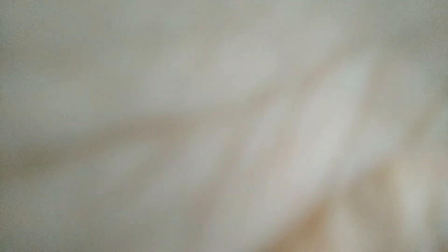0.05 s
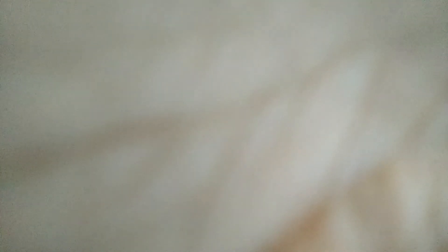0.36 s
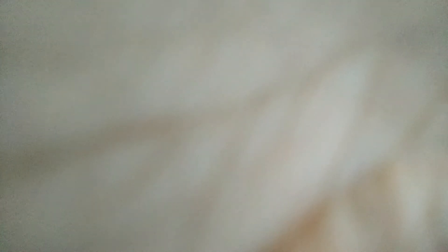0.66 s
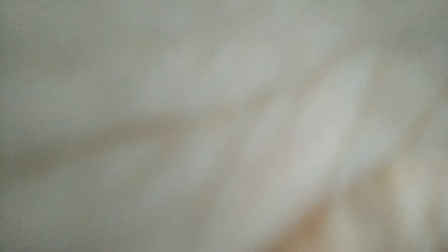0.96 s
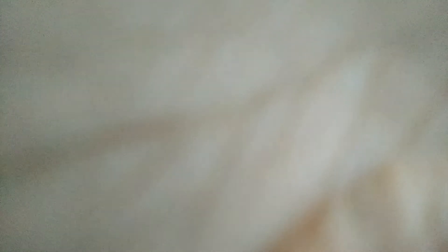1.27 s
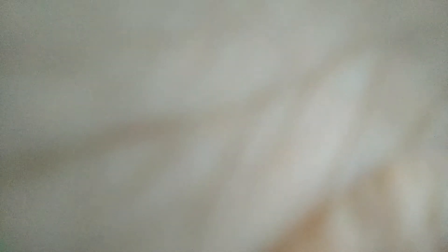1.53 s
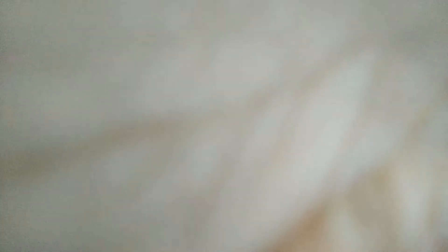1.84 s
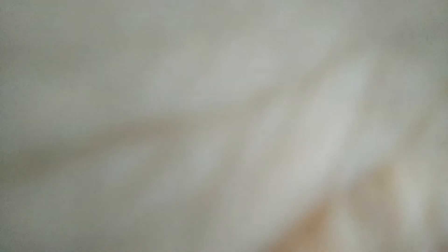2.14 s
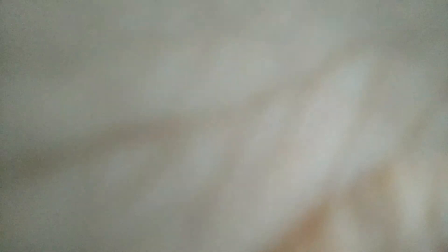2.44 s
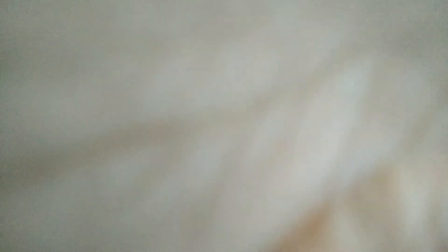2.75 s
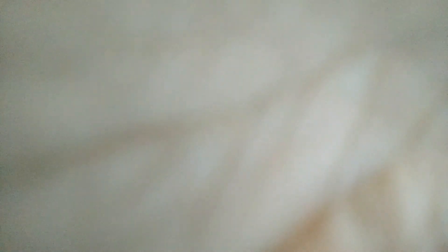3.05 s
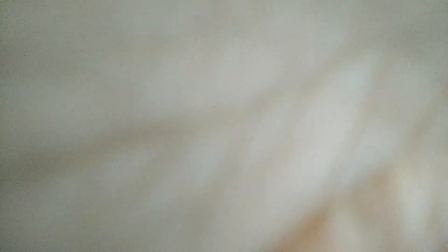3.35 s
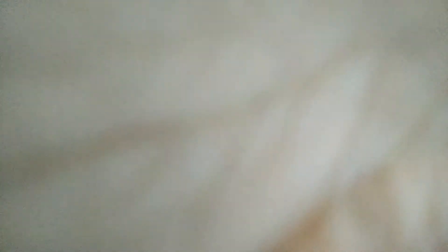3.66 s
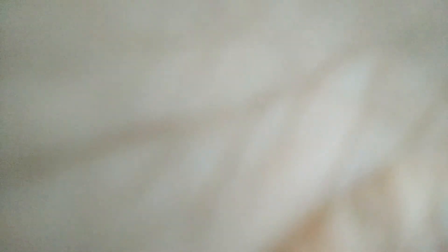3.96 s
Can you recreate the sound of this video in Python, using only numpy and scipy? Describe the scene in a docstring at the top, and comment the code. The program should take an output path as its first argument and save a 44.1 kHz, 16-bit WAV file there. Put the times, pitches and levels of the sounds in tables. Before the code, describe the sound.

Heard from the cabin, a vehicle's engine hums deeply over rumbling tyres while a loose panel buzzes. The engine drops in pitch, the rattle breaks into bursts with faint trim ticks between, and a low boom closes.

```python
"""Inside a moving vehicle, the engine drones low over the rumble of the road.
A loose panel rattles against its mount from the start, harder once in each engine firing cycle.
Past halfway the rattle stops, then returns briefly as the engine slows, as at a gear change.
A few light ticks of loose trim fill the next pause, and the rattle starts again.
Near the end the cabin booms."""
import sys
import numpy as np
from scipy import signal
from scipy.fft import rfft, irfft, next_fast_len
from scipy.io import wavfile
from scipy.ndimage import uniform_filter1d, map_coordinates

SR = 44100
rng = np.random.default_rng(int(sys.argv[2]) if len(sys.argv) > 2 else 0)


def bounce(signal):
    """Save signal as a 16-bit WAV file at the path given by the first command-line argument."""
    frames = np.transpose(np.atleast_2d(signal))
    limited = np.clip(frames, -1, 1)
    pcm = np.round(limited * 32767).astype(np.int16)
    wavfile.write(sys.argv[1], SR, pcm)


N = 176400

# The engine's hum: (time [s], firing rate [Hz], first harmonic [dB], second harmonic [dB])
ENGINE_HUM = [(0, 61.41, -21.5, -39), (.2, 62.91, -25.5, -33), (.6, 64.96, -21, -35.5),
              (1.08, 63.06, -23.5, -33.5), (1.55, 64.64, -21.5, -38), (1.78, 65.8, -24.5, -37),
              (2.05, 65.13, -22, -34), (2.22, 66.57, -32.5, -34.5), (2.39, 66.85, -19.5, -31),
              (2.52, 66.55, -25, -44), (2.62, 66.62, -22.5, -41), (2.75, 62.14, -18, -36),
              (2.88, 55.86, -35, -32), (2.97, 54.01, -19.5, -33.5), (3.3, 51.79, -21.5, -30.5),
              (3.55, 51.76, -25.5, -38), (3.85, 54.42, -19.5, -32), (4, 56.2, -27.5, -36)]
# How strongly the panel rattles: (time [s], body level [dB], treble level [dB])
RATTLE_LEVELS = [(0, -26.5, -50.5), (.08, -31, -57.5), (.125, -28.5, -49), (.17, -30, -55),
                 (.255, -28.5, -51), (.3, -30.5, -54.5), (.4, -27.5, -50), (.47, -27.5, -53),
                 (.51, -30, -60), (.58, -26.5, -51), (.62, -29, -58), (.655, -29, -54), (.69, -29, -57),
                 (.745, -28.5, -50), (.78, -27.5, -51.5), (1.02, -27.5, -54.5), (1.16, -30, -53),
                 (1.2, -32.5, -57), (1.26, -28.5, -54.5), (1.55, -30.5, -54), (1.6, -27, -51),
                 (1.68, -28, -54.5), (1.83, -27.5, -52.5), (1.92, -31, -54.5), (2.03, -29, -54),
                 (2.26, -30, -56.5), (2.335, -31, -56.5), (2.39, -44, -65), (2.79, -49.5, -76),
                 (2.83, -35.5, -61.5), (2.89, -31, -54), (2.93, -36.5, -61.5), (2.97, -46.5, -77),
                 (3.3, -69.5, -76), (3.335, -33.5, -59.5), (3.41, -37, -54.5), (3.47, -35, -57),
                 (3.52, -35.5, -53.5), (3.58, -34, -55), (3.7, -32.5, -54), (3.84, -36.5, -59.5),
                 (3.9, -51, -74)]
# The low notes the panel rings at: (pitch [Hz], width [Hz], level [dB], left over right [dB],
# left phase lead [rad], change at low engine speed [dB])
PANEL_LOW_NOTES = [(194, 14, -5, 3, .2, -3), (268, 36, -7.5, 5, .4, -1), (296, 24, 1, 6, .4, -3),
                   (324, 24, -6, 5, .3, 7), (375, 50, -15, 5, .6, -4), (441, 24, 2, 6.5, .9, 1.5),
                   (480, 24, 3.5, 6.5, .8, -3), (517, 20, 0, 5.5, .6, -3), (542, 22, -3, 4, .5, -3),
                   (626, 28, -11.5, 8, .9, -1), (780, 42, -12, 0, .7, 0), (889, 24, -16, 0, .6, -4)]
# Its thin upper notes, with the same columns
PANEL_HIGH_NOTES = [(970, 70, 7, -2, .5, -3), (1055, 50, 8, -6, 2.5, -3), (1169, 34, 11.5, -4, -.7, -1),
                    (1248, 30, 11.5, -5, -1.5, -3), (1330, 70, 6, -4, .6, 2), (1570, 70, 0, -3, 2, -1),
                    (1679, 40, 6, -3, 2.1, 1), (1808, 60, 8, -4, 2.3, 0), (2048, 34, 2, -9, -1.3, 6),
                    (2186, 34, 0, -7, 0, 7), (2316, 36, 2, -9, -1, 0), (2430, 44, -1, -8, -2, 7),
                    (2540, 70, -3, -4, .4, 8), (2660, 50, 0, 4, 1.8, 1), (3080, 70, -3.5, -8, 1.8, 1),
                    (4000, 110, -3.5, -8, 2.8, -2)]
# The tone of the panel's rasp: (frequency [Hz], level [dB])
RASP_TONE = [(100, -19.5), (250, 4), (520, 4), (690, -1), (1000, 2.5), (1480, -1), (1950, -3), (2600, -4.5),
             (3100, -4.5), (3600, -9), (4200, -6), (5400, -10), (6400, -16), (7100, -23.5), (8500, -28),
             (15000, -31)]
# Which side the rasp is heard on: (frequency [Hz], left over right [dB])
RASP_SIDE = [(800, -3), (1200, -4.5), (2200, -4), (3300, -2.5), (4600, -9), (6000, -8.5), (9000, -4)]
# Taps of loose trim: (time [s], level [dB])
TICK_HITS = [(2.778, -53), (3.055, -55), (3.1142, -51), (3.2061, -49), (3.2303, -51), (3.249, -50),
             (3.268, -48.5), (3.3265, -47), (3.3863, -44)]
# The tone of one tap: (frequency [Hz], level [dB])
TICK_TONE = [(400, -17.5), (2000, 6.5), (5500, 9), (9000, -6), (15000, -25)]
# How loud the road is: (time [s], level [dB])
RUMBLE_LEVEL = [(0, -26.5), (1.8, -26.5), (2.1, -25.5), (2.8, -26.5), (3.05, -24), (3.5, -22.5),
                (3.8, -26.5), (4, -27)]
# The tone of the tyres on the road: (frequency [Hz], level [dB])
RUMBLE_TONE = [(15, -46.5), (28, -36), (40, -2), (55, -7.5), (72, 3), (100, -7.5), (160, -19.5),
               (300, -27.5), (595, -31.5), (660, -41), (800, -35), (1050, -45), (1380, -50), (1700, -46.5),
               (2900, -64.5), (5800, -66), (7500, -77.5), (15000, -77)]
# How alike the road sounds at both ears: (frequency [Hz], likeness [-1 to 1])
RUMBLE_LIKENESS = [(90, 0.91), (160, 0.67), (600, .6), (1500, -0.38), (4000, 0.74), (9000, 0.82)]


def amp(db):
    """Turn decibels into a gain."""
    return 10 ** (np.asarray(db) / 20)


def unit(x):
    """Scale a signal to an average power of 1."""
    return x / np.sqrt(np.mean(x ** 2) + 1e-20)


def along(points, hz):
    """Read a (frequency, value) table at hz, on a log frequency scale."""
    freqs, values = np.transpose(points)
    return np.interp(np.log(hz + 1), np.log(freqs + 1), values)


def curves(rows):
    """One value per sample for each column after the time."""
    times, *columns = np.transpose(rows)
    return [np.interp(np.arange(N) / SR, times, column) for column in columns]


def wobble(rate):
    """A smooth random curve through rate points a second."""
    points = rng.standard_normal(int(N * rate / SR) + 4)
    return map_coordinates(points, [np.arange(N) * rate / SR])


def filtered(x, response):
    """Filter x; response(hz) gives the gain and phase shift at each frequency."""
    size = next_fast_len(N + SR // 2)
    return irfft(rfft(x, size) * response(np.fft.rfftfreq(size, 1 / SR)), size)[..., :N]


def placed(pan_db, lead):
    """Left and right gains: the left is pan_db louder and lead radians ahead."""
    half = np.atleast_1d(amp(pan_db / 2) * np.exp(1j * lead / 2))
    return np.array([half, 1 / half])


def engine(phase, first_db, second_db):
    """The firings hum in three slightly unsteady harmonics; the third comes with the rattle."""
    body_db, _ = curves(RATTLE_LEVELS)
    levels_db = [first_db + .12, second_db - .3, .5 * body_db - 24.5]
    hum = np.zeros(N)
    for harmonic, db in enumerate(levels_db, 1):
        loudness = amp(db + 1.73 * wobble(21.86))
        hum += loudness * np.sin(harmonic * (phase + .083 * wobble(14)))
    return np.sqrt(2) * hum


def rattle(phase, firing_hz, contacts_per_s=2000, scatter_db=1.5, firing_swing_db=2.3):
    """Random knocks, harder once per firing cycle, ring the panel and rasp round the cabin."""
    body_db, treble_db = curves(RATTLE_LEVELS)
    slow = np.interp(firing_hz, [52.5, 57], [1, 0])  # 1 at low engine speed, 0 at high
    touching = rng.random(N) < contacts_per_s / SR
    size_db = scatter_db * (2 * rng.random(N) - 1) + firing_swing_db * np.cos(phase)
    contacts = touching * np.sign(rng.standard_normal(N)) * amp(size_db)
    rasp = unit(filtered(cabin_echoes(contacts, fade_s=.03), rasp_colour))
    body = stiff_mount(panel_ring(contacts, PANEL_LOW_NOTES, slow))
    treble = amp(5.3) * panel_ring(contacts, PANEL_HIGH_NOTES, slow) + amp(3.6) * rasp
    return amp(body_db + 1.7) * body + amp(treble_db) * treble


def panel_ring(contacts, notes, slow):
    """The knocked panel rings at its own notes; slow (0-1) shifts their balance."""
    def response(hz):
        fast_sum = slow_sum = 0
        for pitch, width, db, pan_db, lead, slow_db in notes:
            peak = 1j * hz * width / (pitch ** 2 - hz ** 2 + 1j * hz * width)
            note = amp(db) * placed(pan_db, lead) * peak ** 2  # squared for steeper sides
            fast_sum += note
            slow_sum += amp(slow_db) * note
        return np.array([fast_sum, slow_sum])
    at_fast, at_slow = filtered(contacts, response)
    return ((1 - slow) * at_fast + slow * at_slow) / np.std(at_fast)


def stiff_mount(swing, give_s=.09, stiffening=.7):
    """The mount stiffens as the panel swings wider, which evens out its swells."""
    power = np.mean(swing ** 2, axis=0)
    smooth_power = np.abs(uniform_filter1d(power, int(give_s * SR))) + 1e-9
    return unit(swing / smooth_power ** (stiffening / 2))


def rasp_colour(hz, spacing_hz=65, uneven_db=2):
    """Many small, crowded resonances ripple the rasp's tone, differently on each side."""
    centres = np.arange(0, SR / 2, spacing_hz)
    heights = rng.standard_normal((2, len(centres)))
    ripple_db = uneven_db * np.array([np.interp(hz, centres, side) for side in heights])
    return amp(along(RASP_TONE, hz) + ripple_db) * placed(along(RASP_SIDE, hz), 0)


def ticks():
    """Loose trim gives single light taps that echo briefly in the cabin."""
    taps = np.zeros(N)
    for time_s, db in TICK_HITS:
        taps[round(time_s * SR)] = amp(db - 3.5) / 2
    return filtered(cabin_echoes(taps, fade_s=.042), lambda hz: amp(along(TICK_TONE, hz)))


def cabin_echoes(x, fade_s, block=256):
    """Dense echoes, dying at 60 dB per fade_s, new for each side and each block of samples."""
    pieces = np.pad(x, (0, -N % block)).reshape(1, -1, block)
    t = np.arange(SR // 32) / SR
    tails = rng.standard_normal((2, pieces.shape[1], len(t))) * np.exp(-np.log(1000) * t / fade_s)
    echoes = signal.fftconvolve(pieces, tails, axes=2)
    # Add each block's echoes back in at its own place in time.
    positions = block * np.arange(echoes.shape[1])[:, None] + np.arange(echoes.shape[2])
    return np.array([np.bincount(positions.ravel(), side.ravel())[:N] for side in echoes])


def cabin_boom(start_s=3.735, pitch_hz=70.69, rise_s=.0077, growth_db_per_s=2.5):
    """A low cabin resonance swells up quickly, then keeps growing slightly."""
    age = np.maximum(np.arange(N) / SR - start_s, 0)
    loudness = amp(-15.5 + growth_db_per_s * age) * (1 - np.exp(-age / rise_s))
    return np.sqrt(2) * loudness * np.sin(2 * np.pi * pitch_hz * age)


def road():
    """The tyres and the vehicle's body rumble, alike at both ears in the bass."""
    def response(hz):
        spread = np.arccos(along(RUMBLE_LIKENESS, hz)) / 2
        return amp(along(RUMBLE_TONE, hz)) * [np.cos(spread), np.sin(spread)]
    level_db, = curves(RUMBLE_LEVEL)
    shared, opposed = filtered(rng.standard_normal((2, N)), response)
    rumble = unit(np.array([shared + opposed, shared - opposed]))
    return amp(level_db + .24 * wobble(10)) * rumble


def scene():
    """Mix all the sounds in stereo; the engine drives both the drone and the rattle."""
    firing_hz, first_db, second_db = curves(ENGINE_HUM)
    phase = 2 * np.pi * np.cumsum(firing_hz) / SR  # one turn per firing
    low_sounds = road() + engine(phase, first_db, second_db) + cabin_boom()
    lean_left = amp([[.5], [-.5]])
    return low_sounds * lean_left + rattle(phase, firing_hz) + ticks()


def record(dry, top_hz=15720):
    """Cut away the very highest treble."""
    return filtered(dry, lambda hz: hz < top_hz)


dry = scene()
out = record(dry)
bounce(out)
```